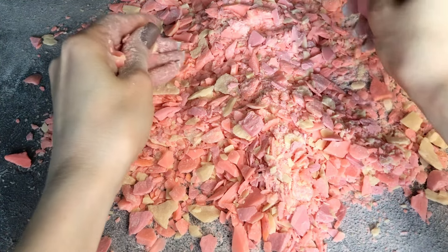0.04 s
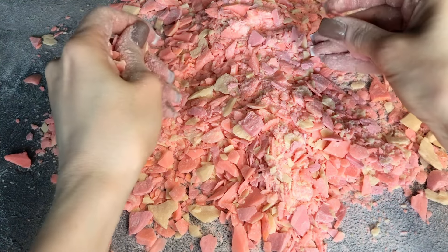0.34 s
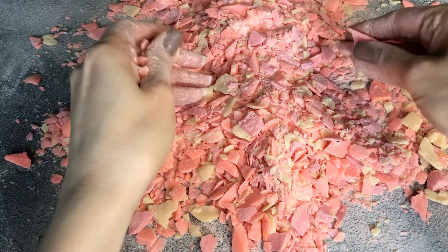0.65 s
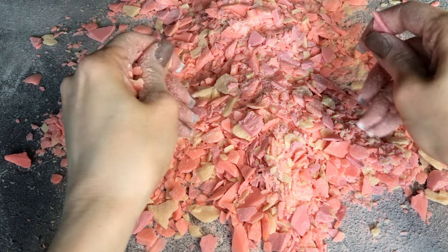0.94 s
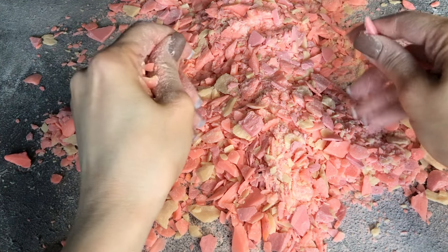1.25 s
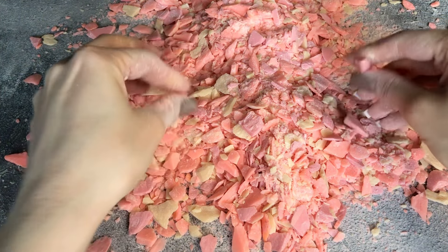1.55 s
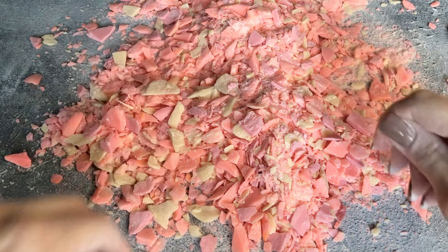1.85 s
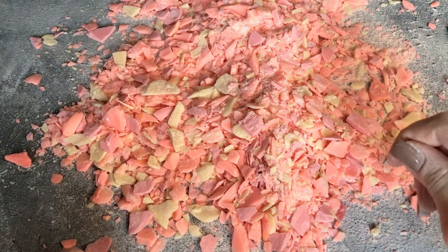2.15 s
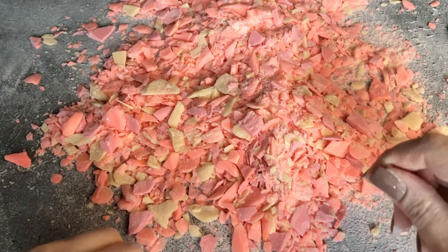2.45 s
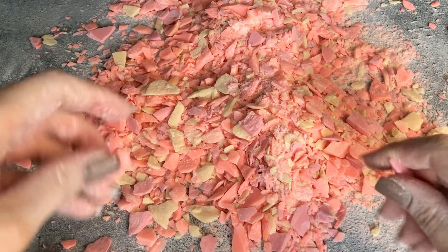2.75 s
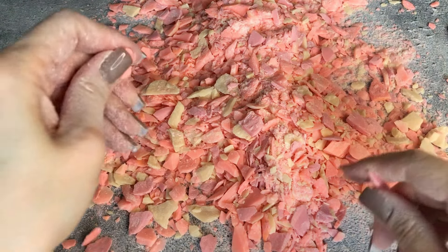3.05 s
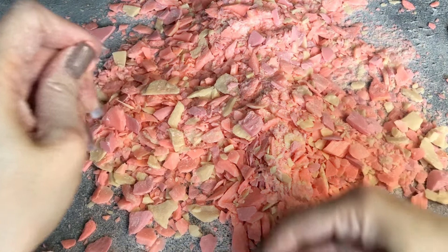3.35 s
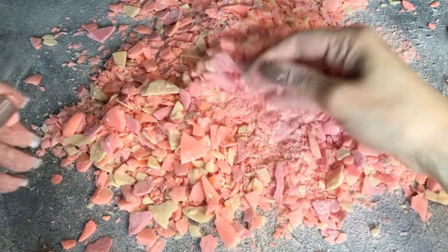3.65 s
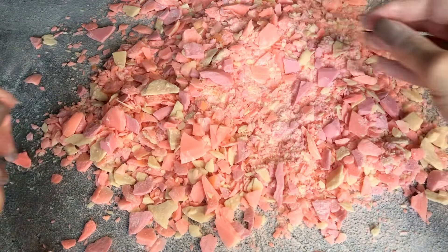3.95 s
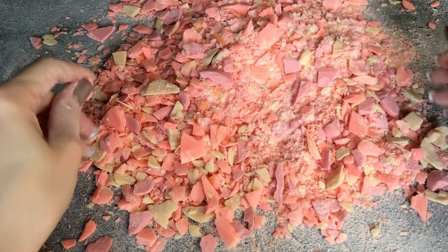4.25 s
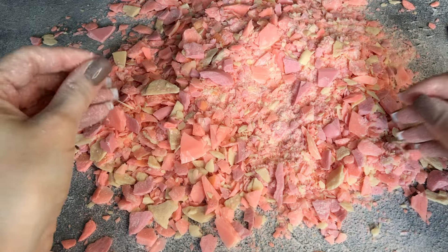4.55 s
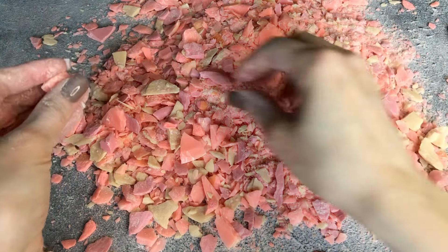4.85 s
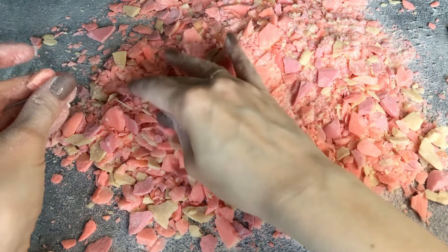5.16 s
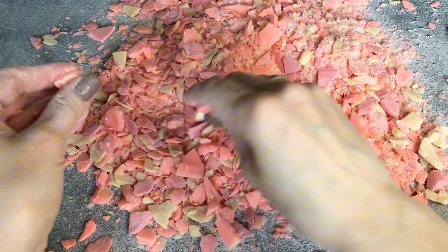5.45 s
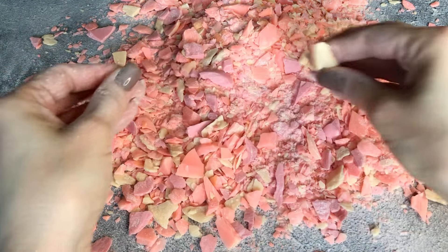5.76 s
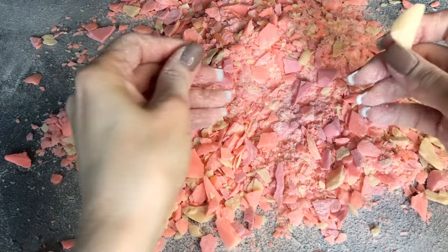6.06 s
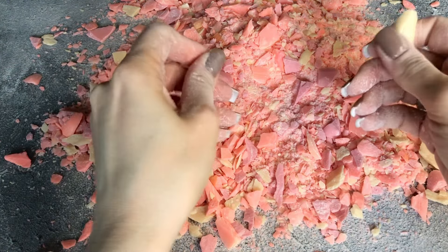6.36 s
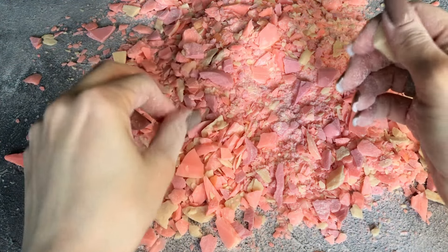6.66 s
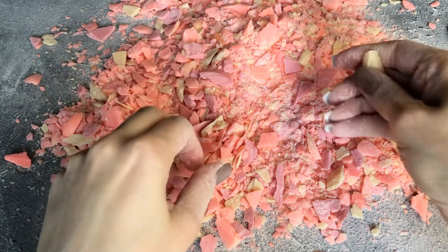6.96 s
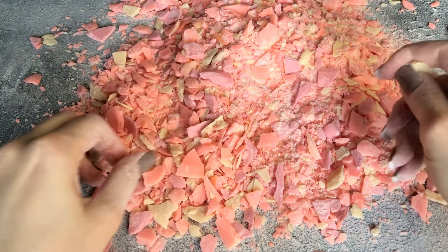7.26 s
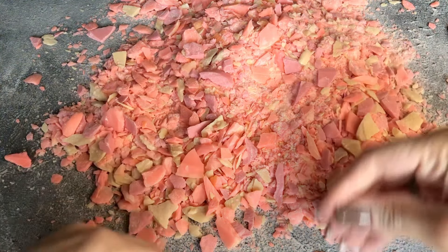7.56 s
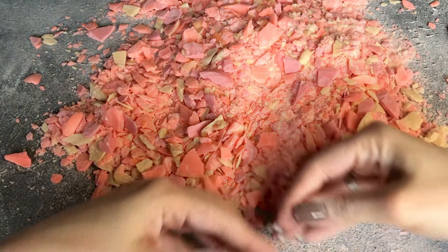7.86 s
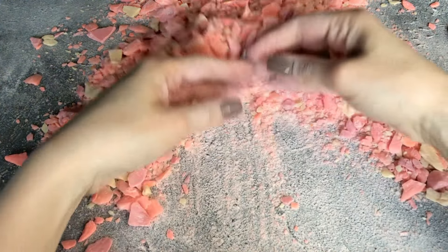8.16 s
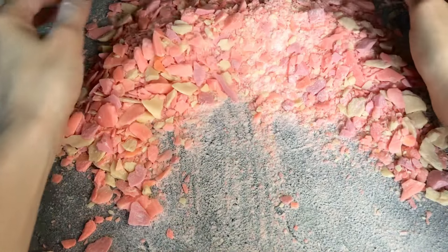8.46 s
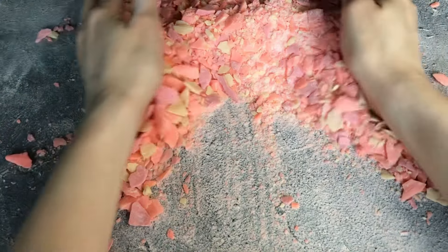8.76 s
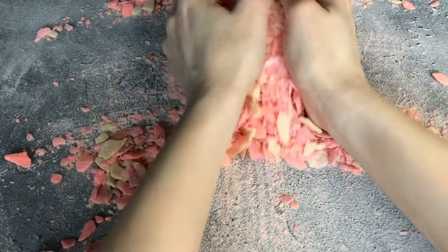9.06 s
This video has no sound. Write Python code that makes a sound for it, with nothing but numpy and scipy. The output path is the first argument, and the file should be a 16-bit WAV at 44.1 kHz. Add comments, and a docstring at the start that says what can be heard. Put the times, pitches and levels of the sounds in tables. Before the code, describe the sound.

Dry soap flakes snap between fingers, close up in a small room with faint hiss and low hum. For the first two seconds, tiny sharp cracks come irregularly over soft gritty rubbing, with a strong snap at about 1 second and a cluster near 1.5. From 2.1 to 2.5 seconds, thicker pieces break with dull knocks that ring through the hard table. More crisp cracks land around 3 seconds, then a hand rakes the heap with a short rustle near 3.5. A lull follows, with light rustling around 5.2 seconds. Scattered snaps and small knocks return from 5.7 to 7.7, sharpest at 6.2 and 7.2. From 7.8 seconds, hands push the pile in a dense, crunchy rush that swells at 8 and again near 8.9, with a few cracks, brief scrapes and the tabletop drumming underneath, easing off just after 9 seconds.

```python
"""Snapping dry soap flakes

Fingers snap brittle flakes over a heap on a hard table, close by in a small room. Each snap is a tiny
crack that rings the flake and runs through the tabletop; thick pieces give way with knocks. In between
and at the end, hands rake the heap: a dense rush of flakes over the drumming table."""
import sys
import numpy as np
from scipy import signal
from scipy.fft import rfft, irfft
from scipy.io import wavfile
from scipy.ndimage import uniform_filter1d

SR = 44100
rng = np.random.default_rng(int(sys.argv[2]) if len(sys.argv) > 2 else 0)


def persist_wave(psi):
    """Save psi, clipped to +-1, as 16-bit WAV."""
    counts = np.round(np.clip(psi, -1, 1) * 32767).astype(np.int16)
    wavfile.write(sys.argv[1], SR, np.atleast_2d(counts).T)


N = 406602
RUN_UP_S = 0.005  # a hit's waveform starts this early


def undb(db):
    """Decibels to gain."""
    return 10 ** (np.asarray(db) / 20)


def unit(x):
    """Scale to rms 1."""
    return x / np.sqrt(np.mean(x ** 2) + 1e-18)


def add(out, at_s, sound):
    """Mix a sound in at a time."""
    i = max(int(at_s * SR), 0)
    out[i:i + len(sound)] += sound[:len(out) - i]


def freqs(size):
    """Bin frequencies, at least 1 Hz."""
    return np.maximum(np.arange(size // 2 + 1) * SR / size, 1)


def shape(f, points):
    """Gain from (f/Hz, level/dB) points joined on a log axis."""
    hz, db = np.transpose(points)
    return undb(np.interp(np.log(f), np.log(hz), db))


def colour(x, points):
    """Filter by (f/Hz, level/dB) points; rms 1."""
    return unit(irfft(rfft(x) * shape(freqs(N), points), N))


def butterworth(x, order, hz, kind):
    """Causal Butterworth filter."""
    return signal.sosfilt(signal.butter(order, hz, kind, fs=SR, output="sos"), x)


def walk(rate_hz):
    """Smooth random drift, rms 1."""
    knots = np.arange(0, N, SR / rate_hz)
    return unit(np.interp(np.arange(N), knots, rng.standard_normal(len(knots))))


def grains(per_s, spread_db):
    """Random contacts, mostly small, a few large."""
    size = undb(spread_db * np.minimum(rng.exponential(size=N), 5))
    return unit((rng.random(N) < per_s / SR) * size * rng.choice([-1, 1], N))


def hit(spectrum):
    """Waveform of a hit with its run-up, rms 1."""
    return np.roll(unit(irfft(spectrum)), int(RUN_UP_S * SR))


def air(level_db=-51.5, hum_db=-59, hum_hz=72):
    """Room rumble and hiss, with a wavering low hum."""
    # background spectrum: f/Hz, level/dB
    noise_spectrum = [(15, -37), (25, -7), (43, -7), (64, -8.5), (153, -4.5), (170, -7.5), (301, -11),
                      (427, -11.5), (489, -15.5), (754, -18.5), (818, -16), (1190, -24), (7310, -29.5),
                      (11300, -28.5), (16000, -42.5)]
    hum = unit(irfft(rfft(rng.standard_normal(N)) / (1 + ((freqs(N) - hum_hz) / 3) ** 2), N))
    noise = colour(rng.standard_normal(N), noise_spectrum)
    return noise * undb(level_db + 0.08 * walk(2.42)) + undb(hum_db) * hum


def room(x, wet_db=-8, delay_s=0.0075, build_s=0.00092):
    """Diffuse echoes of bare walls; the treble dies first."""
    # reverberation time: f/Hz, t60/s
    decay_times = [(150, 0.69), (500, 0.44), (1400, 0.52), (3700, 0.43), (9000, 0.27), (15000, 0.29)]
    t, f = np.arange(SR) / SR, freqs(SR)
    hz, t60s = np.transpose(decay_times)
    noise = rfft(rng.standard_normal(SR) * undb(2.4 * rng.standard_normal(SR)))
    bands = [irfft(noise * np.interp(np.log(f), np.log(hz), share), SR) for share in np.eye(len(hz))]
    tail = sum(band * np.exp(-np.log(1000) * t / t60) for band, t60 in zip(bands, t60s))
    tail *= np.clip((t - delay_s) / build_s, 0, 1)
    tone = shape(f, [(200, -1.5), (1500, 0), (5000, -0.5), (10000, -5.0), (15000, -1.0)])
    tail = irfft(rfft(tail) * tone, SR)
    return undb(wet_db) * signal.fftconvolve(x, tail / np.sqrt(np.sum(tail ** 2)))[:N]


def bending(f, lag_ms):
    """Bending waves travel as the root of frequency: 1 kHz lags by lag_ms, the bass more."""
    return np.exp(-4j * np.pi * lag_ms * np.sqrt(f / 1000))


def tabletop(drive):
    """The table rings in its damped modes."""
    # tabletop modes: f/Hz, level/dB, t60/s
    modes = [(125, -34, 0.5), (205.6, 9.5, 0.48), (275, -6, 0.16), (316, -20, 0.1), (328, -22, 0.22),
             (401, -12, 0.22), (432, -2.5, 0.43), (519, 4.5, 0.09), (802, 10, .15)]
    t = np.arange(SR // 2) / SR
    ring = sum(undb(db - 60 * t / t60) * np.sin(2 * np.pi * hz * t) for hz, db, t60 in modes)
    return signal.fftconvolve(drive, ring / np.sqrt(np.sum(ring ** 2)))[:N]


def flakes(per_s, spread_db, ring_gain=0.91, decay_cycles=1.27):
    """Tumbling flakes: broad clicks, plus brief rings from flakes of many sizes."""
    t, ringing = np.arange(256) / SR, 0
    for hz in np.geomspace(900, 14000, num=12):
        ring = np.sin(2 * np.pi * hz * t) * np.exp(-t * hz / decay_cycles)
        ringing = ringing + np.sqrt(hz) * unit(signal.oaconvolve(grains(per_s / 12, spread_db), ring)[:N])
    return unit(grains(per_s, spread_db) + ring_gain * unit(ringing))


def rubbing(grating_db=-2, waver_db=2, ticks_db=-9, rest_db=-64, sigma_s=0.082):
    """Crumbs grate faintly between fingertips; now and then a tiny one breaks off."""
    # fingertip rubs: t/s, level/dB
    rubs = [(0.19, -50), (0.72, -50), (1.62, -49.5), (2.08, -53.5), (3.15, -60.5), (4.08, -62), (4.6, -57),
            (5.68, -55), (5.94, -59), (6.8, -51), (7.16, -55.5), (7.56, -65)]
    t = np.arange(N) / SR
    effort = undb(rest_db) + sum(undb(db) * np.exp(-((t - at_s) / sigma_s) ** 2 / 2) for at_s, db in rubs)
    grating = colour(flakes(3500, 6.1), [(300, 12.5), (1200, -7.5), (8000, -9.5), (16000, -8)])
    grating *= undb(waver_db * walk(20))
    ticks = colour(flakes(36, 1.9), [(500, 7), (3000, 0), (8000, 8), (16000, -7.5)])
    return effort * (undb(grating_db) * grating + undb(ticks_db) * ticks)


def scrapes(half_band=0.1):
    """A piece dragged on the table sticks and slips unevenly, ringing at one pitch."""
    # drags: t/s, level/dB, f/Hz, Gaussian sigma/s
    drags = [(3.507, -36.5, 292, 0.04), (4.006, -57.5, 1530, 0.055), (5.23, -49, 1000, 0.051),
             (8.043, -27.5, 285, 0.043), (8.857, -33.5, 1500, 0.081), (8.994, -30, 454, 0.05)]
    out, t = np.zeros(N), np.arange(N) / SR
    slips = grains(per_s=1500, spread_db=3)
    for at_s, db, hz, sigma_s in drags:
        ringing = butterworth(slips, 2, [hz * (1 - half_band), hz * (1 + half_band)], "band")
        out += unit(ringing) * undb(db) * np.exp(-((t - at_s) / sigma_s) ** 2 / 2)
    return out


def strokes(land_s=0.03, lift_s=0.036, curve=1.36):
    """A hand rakes the heap; the rush rises or falls between landing and lifting.
    Returns gains: rush, pressure, table ring, powder, dust."""
    # hand strokes: landing t/s, reference t/s, lifting t/s, reference rush level/dB,
    # start below reference/dB, end below reference/dB,
    # then relative to the rush: pressure/dB, table ring/dB, powder/dB, dust/dB
    moves = [(2.23, 2.246, 2.35, -47, 3, 9, 6, 15, -23, -25),
             (2.368, 2.368, 2.55, -45.5, 3, 14, 1, 1.5, -23, -25),
             (3.271, 3.384, 3.41, -42, 0.5, -6, 2.5, 0, -20, -26),
             (3.4, 3.493, 3.868, -37, 5, 13.5, -1.5, -6, -0.5, -7),
             (5.157, 5.188, 5.28, -44.5, 0, 0, 1.5, -6, -8, -14),
             (5.291, 5.324, 5.45, -46, -12, 13, 3, -1, -3.5, -10),
             (7.604, 7.73, 7.65, -46.5, -2.5, -5.5, 0, -3, -3.5, -22),
             (7.779, 8.007, 8.246, -28, 13.5, 14, 1, -12, -8.5, -21),
             (8.261, 8.447, 8.6, -42, 1, 4.5, -1.5, -4, -2.5, -9.5),
             (8.588, 8.879, 9.244, -27.5, 7, 14.5, -2, -15, -9.5, -17)]
    follows = [1, 0.78, 0.21, 0.95, 0.95]  # share of the level change; fingertips keep the table ringing
    t, power = np.arange(N) / SR, np.zeros((5, N))
    for lands, ref_s, lifts, db, start_below_db, end_below_db, *shares_db in moves:
        on = (t > lands) & (t < lifts + lift_s)
        contact = np.clip(np.minimum((t[on] - lands) / land_s, 1 - (t[on] - lifts) / lift_s), 0, 1)
        before = np.interp(t[on], [lands, ref_s], [1, 0])
        after = np.interp(t[on], [ref_s, lifts], [0, 1])
        below_db = start_below_db * before ** curve + end_below_db * after ** curve
        layers_db = [db + rel_db - follow * below_db for rel_db, follow in zip([0, *shares_db], follows)]
        power[:, on] += (contact * undb(layers_db)) ** 2
    return np.sqrt(power)


def raking(powder_db=-0.5, chips_db=-8.5, jerk_db=1.1, clump_db=0.8, split_hz=6000):
    """Hands push the heap: the harder the stroke, the more flakes collide and the table drums."""
    # tone of colliding flakes: f/Hz, level/dB
    rush_tone = [(250, -24), (500, -9), (800, -3.5), (1150, -3.5), (1550, -2), (2300, -8.5), (3300, -5),
                 (4700, -7.5), (9000, -11.5), (13000, -18.5), (16000, -43)]
    # tone of the drumming table: f/Hz, level/dB
    drum_tone = [(30, -23), (70, -14.5), (130, -5.5), (200, -2.5), (245, -6), (290, 1.5), (335, -7),
                 (420, -3.5), (600, -10), (1000, -16), (1800, -38)]
    rush, pressure, ringing, powder, dusty = strokes()
    per_s = 3000 + 300000 * rush
    coarse = butterworth(colour(flakes(per_s, 4.8), rush_tone), 2, split_hz, "low")
    fine = butterworth(colour(flakes(per_s, 4.5), rush_tone), 4, split_hz, "high")
    dust = colour(flakes(per_s, 5.5), [(6000, -34), (10000, 0), (13000, -1), (16000, -6)])
    coarse = unit(coarse * undb(clump_db * walk(220)))  # flakes give way in clumps
    fine = powder * unit(fine * undb(clump_db * walk(220))) + dusty * dust
    chips = colour(flakes(110, 3.5), [(500, -15), (1500, 5), (5000, -1.0), (10000, -10), (16000, -27)])
    steady = np.sqrt(np.mean(per_s) / per_s)  # level follows the stroke, not the contact rate
    heap = steady * (rush * coarse + undb(powder_db) * fine) + undb(chips_db) * rush * chips
    thuds = colour(grains(2000, 2.44), drum_tone)
    drum = pressure * thuds + tabletop(ringing * thuds) / np.std(tabletop(thuds))
    return (heap + drum) * undb(jerk_db * walk(60))


def knocks(gain_db=-11, ring_db=-15, bass_slope=1.37, cutoff_power=5.4, size=2048):
    """A piece gives way and hits the table: a quick falling thud. Returns thuds and table ring."""
    # impacts through the heap: t/s, level/dB, corner f/Hz, table ring/dB
    impacts = [(0.0685, -31.5, 483, -5.5), (1.0459, -27.5, 410, -18), (1.5533, -33.5, 355, -1),
               (2.1145, -20, 453, 0), (2.2083, -11.5, 423, 1.5), (2.308, -15.5, 496, -2),
               (2.362, -20.5, 410, -1.5), (2.375, -14.5, 555, -4), (2.452, -29, 254, -9),
               (3.284, -28.5, 610, -15), (3.3, -25, 590, 0.5), (5.183, -35.5, 1048, -5),
               (6.593, -40.5, 450, -10), (6.791, -33, 495, -7), (7.23, -36, 428, -20),
               (7.5125, -32, 417, -4), (7.6145, -32.5, 660, 1), (7.668, -30, 536, -5)]
    thuds, drive, f = np.zeros(N), np.zeros(N), freqs(size)
    for at_s, db, hz, table_db in impacts:
        lag_ms = 5.21 * undb(db) ** 0.1525  # lighter knocks are tighter
        push = (f / hz) ** bass_slope / (1 + (f / hz) ** cutoff_power)
        thud = hit(push * bending(f, lag_ms)) * undb(db + gain_db)
        add(thuds, at_s - RUN_UP_S, thud)
        add(drive, at_s - RUN_UP_S, thud * undb(table_db + ring_db))
    return thuds, tabletop(drive)


def snaps(gain_db=-1.0, ring_db=9.0, ring_width_hz=900, rattle_db=-24, rattle_s=0.006, size=2048):
    """A crack opens, crumbles on, rings the flake and crosses the table. Returns direct and room send."""
    # cracks: t/s, level/dB, brightness/dB, top band/dB, flake f/Hz, crumble time/ms, room send/dB
    cracks = [(0.0602, -30.5, -6, -3, 1500, 2.4, -10), (0.0683, -22.5, 3, -1, 1090, 2.4, 0.5),
              (0.071, -24.5, 1, -12, 2000, 2.5, 2.5), (0.3442, -24, 1.5, 4.5, 3060, 1, -3),
              (0.4766, -39, 1, 8, 7900, 0.91, 4), (0.6143, -24, -16, 15, 1800, 2.4, -1.5),
              (0.711, -36, 6, -3, 8200, 2.6, 6), (0.736, -33, -8, 8, 14100, 2.1, -5),
              (0.7686, -30.5, -3, 10, 7950, 0.61, -3), (0.8073, -30.5, 0.5, 8, 7500, 1.9, -10),
              (0.9145, -14, 5.5, -6, 2930, 1.2, -4), (1.003, -32, 6, -6, 6700, .7, -7),
              (1.0462, -7, 10.5, -3, 6700, 0.94, -3), (1.1579, -34, -17, 0, 2000, 2.5, -3),
              (1.1761, -12.5, 6, -13.5, 6800, 0.74, -3.5), (1.407, -34.5, -3, 14.5, 1820, 3, -3),
              (1.468, -37.5, -2, 11, 7000, 1.2, -5), (1.4935, -22.5, 0, -3, 4200, 9.1, 3),
              (1.5039, -20, 7, -7, 3200, 1.5, -0.5), (1.536, -25, 2, -2, 3880, 3.4, 3),
              (1.5537, -16, 1.5, -4, 7500, 1.8, 1), (1.803, -35, 5, -4.5, 13500, 6.4, 5),
              (2.0686, -37.5, 4, -3, 10400, 2, -7), (2.1154, -24, -2, -3, 3380, 2.6, 4),
              (2.1994, -21.5, -12, -1, 990, 1.6, -11), (2.2055, -14, -5, -17, 3700, 3.6, 0.5),
              (2.209, -21, -20, 0, 700, 6, -18), (2.3062, -27, -7, -6, 3700, 1.4, 5),
              (2.3574, -18.5, -11, -7, 3750, 3.5, 5.5), (2.3628, -15, -3.5, 7.5, 3940, 0.84, 1),
              (2.3672, -18.5, -6, -11, 3860, 3.1, 5.5), (2.5368, -28, -12, -6, 1940, 1.9, 1),
              (2.5892, -29, 5, 2.5, 4890, 3, -5), (2.947, -10.5, 6, -3, 3760, 2, 0.5),
              (2.9525, -15.5, 8, -13, 5170, 1.8, 5.5), (2.9555, -9.5, 9, 0, 5000, 1.2, -20),
              (3.018, -19, 0, -19, 4000, 3.7, 3.5), (3.1015, -21, 1.5, -4, 5070, 0.35, -2),
              (3.139, -30, 5, 0, 5500, 1.8, -5), (3.1537, -29, -4, -12, 4180, 2.6, -1),
              (3.259, -25, 13.5, 0.5, 12200, 1, -7), (3.4154, -22.5, -3, -5, 5330, 4.1, 8.5),
              (4.075, -39.5, 3, 7, 13800, 1.1, 10), (5.705, -22.5, 9.5, -8, 4440, 3.7, -6.5),
              (6.0342, -25.5, 2.5, -5, 4970, 1.1, -7), (6.0794, -30.5, -7, 7, 11500, 5.3, 1.5),
              (6.164, -10, 12.5, 0, 8300, 0.44, -10.5), (6.5919, -25, 10, -1, 7800, 0.3, -7),
              (6.7756, -27.5, -9.5, 6, 5700, 5, 4.5), (6.7911, -25, -7, 4, 1390, 2.1, -9),
              (6.8574, -31, -11, 15, 14700, 2.2, -9), (7.2317, -10, 8.5, -4, 3000, 0.69, -5.5),
              (7.4606, -40, 7, 1, 5800, 2.1, -17), (7.512, -21, 7.5, -5.5, 5560, 4, -0.5),
              (7.667, -18, 3, -6, 4980, 1.2, 0), (8.3974, -22.5, -1, -2, 3300, 1.4, 1),
              (8.416, -24, -7, 0, 1600, 3, -2), (8.4418, -17, 4, -6, 9200, 1.9, -0.5),
              (8.4914, -24.5, 0, 0, 6107, 1.8, -1), (8.515, -23, -4, -11, 1580, 3.2, 1.5),
              (8.941, -10, 0, -6, 5100, 1.7, 0)]
    # four crack bands, low to high: level/dB, tilt/(dB per dB of brightness)
    bands = [(-8, 0.03), (-5.5, 0.2), (-2, 0.93), (-6.5, 1.5)]
    band_db, tilt = np.transpose(bands)
    centres_hz, widths_hz = [800, 2900, 7500, 13000], [1200, 3500, 5500, 5500]
    direct, sent, t, f = np.zeros(N), np.zeros(N), np.arange(size) / SR, freqs(size)
    for at_s, db, bright_db, top_db, hz, crumble_ms, room_db in cracks:
        decay = np.exp(-t * 1000 / crumble_ms) + undb(rattle_db) * np.exp(-t / rattle_s)
        crumbs = rng.standard_normal(size) * decay
        crumbs[0] += 2.5  # opening impulse
        ripple = rfft(crumbs)
        ripple /= np.sqrt(uniform_filter1d(abs(ripple) ** 2, size=60))  # keep only the fine ripple
        density_db = band_db + bright_db * tilt + [0, 0, 0, top_db] - 10 * np.log10(widths_hz)
        tone = shape(f, [(60, density_db[0] - 22), (250, density_db[0]),
                         *zip(centres_hz, density_db), (16500, density_db[-1] - 9)])
        flake = 1 + (undb(ring_db) - 1) / (1 + 2j * (f - hz) / ring_width_hz)
        crack = tone * flake * bending(f, lag_ms=1.19)
        gain = np.sqrt(0.002 * SR / size) * undb(db + gain_db)  # level referred to 2 ms
        add(direct, at_s - RUN_UP_S, gain * hit(crack * ripple))
        # the walls collect all directions, so ripple and ring even out
        add(sent, at_s - RUN_UP_S, gain * undb(room_db) * hit(crack / np.sqrt(flake)))
    return direct, sent


def scene(knock_room_db=-2):
    """Snaps, knocks and rustle in the room, mono."""
    cracks, cracks_sent = snaps()
    thuds, ring = knocks()
    rustle = raking() + scrapes() + rubbing()
    echoes = room(cracks_sent + undb(knock_room_db) * thuds + rustle)
    return (cracks + thuds + ring + rustle + echoes + air())[None]


def record(dry, low_hz=30, top_hz=16000):
    """Clip at full scale; cut the deepest bass and the top."""
    thin = butterworth(np.clip(dry, -1, 1), 4, low_hz, "high")
    return signal.sosfilt(signal.ellip(8, 0.2, 70, top_hz, fs=SR, output="sos"), thin)


dry = scene()
out = record(dry)
persist_wave(out)
```